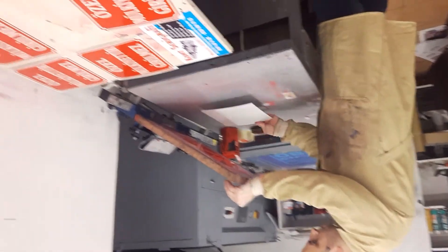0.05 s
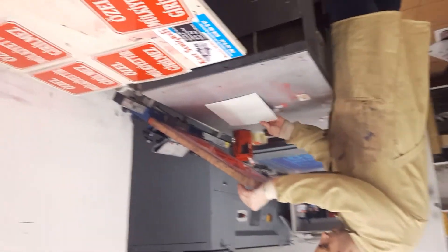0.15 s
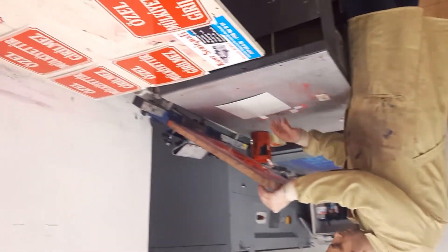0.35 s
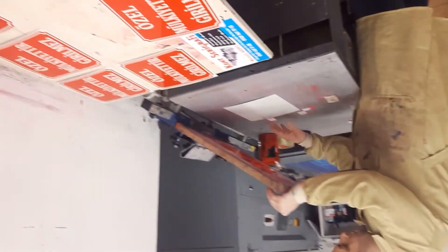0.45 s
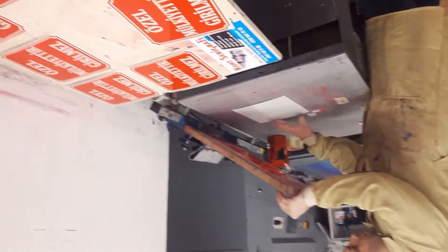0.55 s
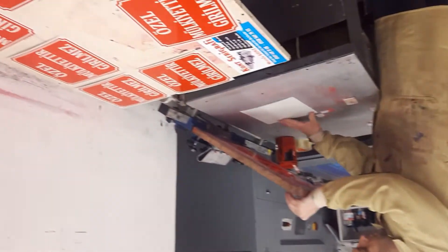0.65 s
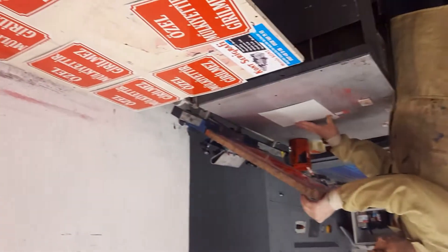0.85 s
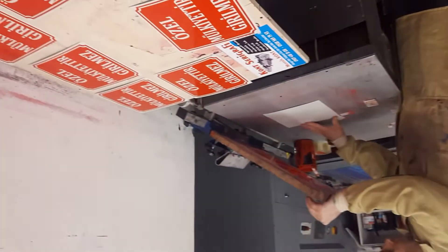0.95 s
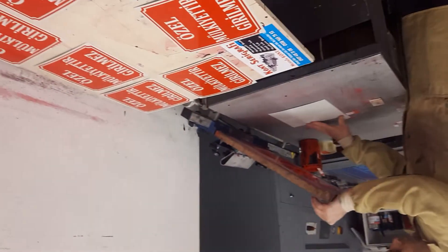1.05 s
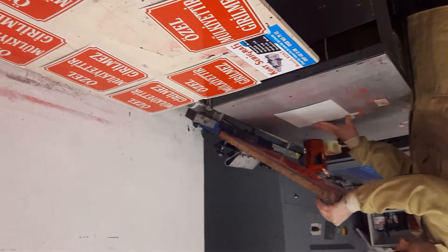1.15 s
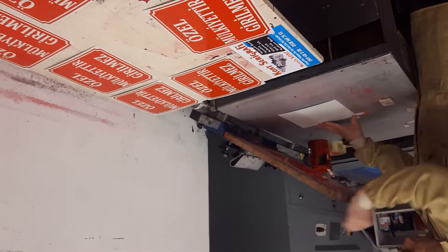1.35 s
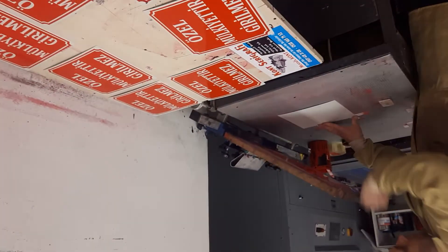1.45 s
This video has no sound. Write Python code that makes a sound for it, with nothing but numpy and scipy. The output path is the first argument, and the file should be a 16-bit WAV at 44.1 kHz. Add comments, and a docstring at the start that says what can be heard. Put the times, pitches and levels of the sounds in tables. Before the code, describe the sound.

Close by in a small workshop, a frame's rough edge catches and drags over a printing table with a ringing rasp, then shifts again. Afterwards a sheet slides gently into place among light knocks, over faint room noise.

```python
"""Small workshop: a screen-printing frame and a sheet are shifted on a printing table.
After a faint brush of the sheet, a rough edge catches, scrapes hard and is pushed once more;
its stick-slip sets the frame and table top ringing. The sheet then slides softly into place
among light knocks and a dull thump. Room air and faint mains hum lie underneath."""
import sys
import numpy as np
from scipy import signal
from scipy.fft import rfft, irfft
from scipy.io import wavfile
from scipy.ndimage import uniform_filter1d, minimum_filter1d

SR = 44100
rng = np.random.default_rng(int(sys.argv[2]) if len(sys.argv) > 2 else 0)


def log_audio(samples):
    """Write samples as a 16-bit WAV file to the path given in sys.argv[1]."""
    # one column per channel
    frames = np.atleast_2d(samples).T
    # limit to full scale, then quantise
    limited = np.clip(frames, -1, 1)
    pcm = np.round(limited * 32767).astype(np.int16)
    wavfile.write(sys.argv[1], SR, pcm)


N = 66150
TIME_S = np.arange(N) / SR
FFT_SIZE = 2 ** 17
FREQS_HZ = np.maximum(np.arange(FFT_SIZE // 2 + 1) * SR / FFT_SIZE, 1)


def from_db(db):
    """Decibels to gain."""
    return 10 ** (np.asarray(db) / 20)


def unit_rms(x):
    """Scale to rms 1."""
    return x / np.sqrt(np.mean(x ** 2) + 1e-20)


def envelope(rows):
    """Gain over time from rows of time_s, level_db."""
    return from_db(np.interp(TIME_S, *np.transpose(rows)))


def pulse(start_s, decay_s):
    """Instant onset, exponential decay."""
    return (TIME_S >= start_s) * np.exp(-np.abs(TIME_S - start_s) / decay_s)


def per_bin(rows):
    """Interpolate rows of freq_hz, value on a log-frequency axis."""
    freq_hz, value = np.transpose(rows)
    return np.interp(np.log(FREQS_HZ), np.log(freq_hz), value)


def colour(x, gain):
    """Minimum-phase filter with the given gain per bin."""
    cepstrum = irfft(np.log(gain + 1e-9))
    cepstrum[1:FFT_SIZE // 2] *= 2
    cepstrum[FFT_SIZE // 2 + 1:] = 0
    return irfft(rfft(x, FFT_SIZE) * np.exp(rfft(cepstrum)))[..., :N]


def shaped(x, spectrum):
    """Apply a spectrum, normalised so white noise keeps its power."""
    return colour(x, unit_rms(from_db(per_bin(spectrum))))


def drift(rate_hz):
    """Low-passed random wander, rms 1."""
    pole = np.exp(-2 * np.pi * rate_hz / SR)
    wander = signal.lfilter([1], [1, -2 * pole, pole * pole], rng.standard_normal(2 * N))
    return unit_rms(wander[N:])


def ring(force, modes):
    """Driven decaying modes, summed with alternating sign."""
    out = 0
    for k, (pitch_hz, gain_db, t60_s) in enumerate(modes):
        radius, angle = from_db(-60 / (t60_s * SR)), 2 * np.pi * pitch_hz / SR
        feedback = [1, -2 * radius * np.cos(angle), radius * radius]
        mode = signal.lfilter([0, np.sin(angle)], feedback, force + 1e-18)
        out = out + (-1) ** k * from_db(gain_db) * mode
    return out


def friction(snaps_per_s=2500, spread_db=2, hiss_share=0.49):
    """Two independent streams of tiny stick-slip snaps over hiss, rms 1."""
    size_db = spread_db * np.minimum(rng.exponential(1, (2, N)), 2.5)
    sizes = from_db(size_db) * rng.choice([-1, 1], (2, N))
    snaps = unit_rms(sizes * (rng.random((2, N)) < snaps_per_s / SR))
    return np.sqrt(1 - hiss_share) * snaps + np.sqrt(hiss_share) * rng.standard_normal((2, N))


# room air: freq_hz, gain_db
AIR_SPECTRUM = [(20, -4), (50, 4), (80, 1), (170, 2), (300, 0), (600, -12), (1200, -12.5), (2500, -16),
                (6000, -33), (9000, -39.5), (16000, -32)]


def room_air(level_db=-55):
    """Still air: steady, bass-heavy noise."""
    return from_db(level_db) * shaped(rng.standard_normal((2, N)), AIR_SPECTRUM)


def mains_hum(pitch_hz=50, level_db=-67):
    """Faint sine at mains frequency."""
    return from_db(level_db) * np.sqrt(2) * np.sin(2 * np.pi * pitch_hz * TIME_S)


# sliding sheet: time_s, level_db
SWISH_LEVEL = [(0, -53), (.15, -61.5), (.9, -72), (1.13, -55), (1.205, -57), (1.216, -45), (1.243, -48),
               (1.255, -40), (1.27, -40.5), (1.31, -44), (1.37, -51), (1.45, -54.5), (1.5, -54.5)]
# sliding sheet: freq_hz, gain_db
SWISH_SPECTRUM = [(300, -27), (1200, -5), (2000, -10.5), (2800, -10), (3370, 4.5), (3580, 7.5), (3760, 11),
                  (4100, -16.5), (4650, -20), (5300, -11), (7000, -19), (9000, -47), (16000, -46)]
# higher rub: time_s, level_db
RUB_ENVELOPE = [(0, -55), (.15, -86), (1.165, -74), (1.178, -46.5), (1.26, -47), (1.34, -58.5), (1.5, -64)]
# higher rub: freq_hz, gain_db
RUB_SPECTRUM = [(2500, -62), (4100, -5), (4480, 5.5), (4680, -1), (4850, 7), (5100, -16), (9000, -43)]


def sheet(flutter_db=1.2):
    """The sheet brushes faintly at first; later a high rub leads into a thin, fluttering swish."""
    flutter = from_db(flutter_db * drift(rate_hz=70))
    swish = shaped(friction() * envelope(SWISH_LEVEL) * flutter, SWISH_SPECTRUM)
    rub = shaped(friction() * envelope(RUB_ENVELOPE) * flutter, RUB_SPECTRUM)
    return swish + rub


# grip of the edge: time_s, level_db
RASP_LEVEL = [(.159, -92), (.162, -39.5), (.177, -39), (.186, -31), (.205, -34), (.245, -41), (.28, -36),
              (.305, -35), (.307, -22.5), (.345, -16.5), (.388, -20.5), (.425, -16.5), (.47, -21),
              (.53, -20.5), (.57, -25.5), (.62, -31.5), (.655, -29), (.695, -31.5), (.77, -25),
              (.838, -24.5), (.852, -28.5), (.92, -38.5), (1.02, -51), (1.12, -44), (1.18, -52), (1.5, -65)]
# friction rasp: freq_hz, gain_db
RASP_SPECTRUM = [(60, -70), (140, -38), (400, -8.5), (1000, -14.5), (1500, -11.5), (2000, -11),
                 (2800, -6.5), (3400, -4.5), (3850, -0.5), (4020, -4), (5000, -5.5), (6100, -9.5),
                 (7200, -11.5), (7900, -22.5), (9500, -39), (16000, -54)]
# treble sizzle: time_s, level_db
SIZZLE_ENVELOPE = [(.159, -98), (.163, -59), (.195, -58.5), (.245, -62), (.275, -54.5), (.305, -56),
                   (.308, -40.5), (.345, -38), (.435, -36.5), (.53, -43), (.6, -55), (.66, -58), (.69, -63),
                   (.77, -48), (.835, -46.5), (.87, -57), (.98, -82), (1.12, -68), (1.2, -97), (1.255, -73),
                   (1.32, -88)]
# treble sizzle: freq_hz, gain_db
SIZZLE_SPECTRUM = [(4000, -37), (8000, -1.5), (9500, -11), (11300, 3), (13000, 2), (16000, 0)]


def scrape(judder_db=0.94):
    """The edge judders over the surface in a spray of snaps: a rasp with fine sizzle on top."""
    snaps = friction() * from_db(judder_db * drift(rate_hz=48))
    rasp = shaped(snaps * envelope(RASP_LEVEL), RASP_SPECTRUM)
    sizzle = shaped(snaps * envelope(SIZZLE_ENVELOPE), SIZZLE_SPECTRUM)
    return rasp + sizzle


# drag on the frame: time_s, level_db
DRAG_LEVEL = [(0, -92), (.16, -68), (.175, -38.5), (.21, -35), (.26, -36.5), (.30, -38), (.335, -24.5),
              (.41, -29), (.46, -31), (.53, -37), (.6, -38), (.69, -36.5), (.8, -51), (.86, -40),
              (.94, -46.5), (1.03, -56), (1.2, -48), (1.27, -47), (1.33, -54), (1.5, -59)]
# frame resonances: pitch_hz, gain_db, t60_s
FRAME_MODES = [(635, -4.5, 0.18), (671, -1, 0.15), (722, -2.5, 0.33), (774, -6.5, 0.24), (805, -2.5, .2),
               (882.8, 0, 0.15), (949, 4, 0.11), (1005, 1, .09), (1077, -0.5, 0.081)]


def frame():
    """Drag keeps the frame's modes ringing."""
    return unit_rms(ring(friction(), FRAME_MODES)) * envelope(DRAG_LEVEL)


# frame groan: time_s, level_db
GROAN_ENVELOPE = [(.16, -91), (.185, -40), (.27, -44), (.3, -34.5), (.33, -40.5), (.37, -32.5), (.42, -30),
                  (.46, -58), (.59, -41.5), (.71, -45), (.78, -73)]


def groan(pitch_hz=633, waver_hz=3.1, roughness_db=2.9):
    """Stick-slip in step with the frame's lowest mode: a rough, wavering tone."""
    freq_hz = pitch_hz + waver_hz * drift(rate_hz=17)
    tone = np.sqrt(2) * np.sin(2 * np.pi * np.cumsum(freq_hz) / SR)
    roughness = from_db(roughness_db * drift(rate_hz=45))
    return envelope(GROAN_ENVELOPE) * roughness * tone


# table-top vibration: time_s, level_db
TABLE_LEVEL = [(.16, -74), (.2, -38), (.3, -38), (.38, -40), (.44, -34), (.53, -33.5), (.62, -42),
               (.73, -39), (.81, -49.5), (.86, -36.5), (.93, -42), (.99, -43.5), (1.06, -49.5),
               (1.2, -47.5), (1.28, -42), (1.36, -47.5), (1.5, -55)]
# table-top rumble: freq_hz, gain_db
RUMBLE_SPECTRUM = [(40, -32), (95, -31), (125, -3), (155, -17.5), (190, -5), (250, -11), (350, -3.5),
                   (450, -3.5), (560, -9.5), (900, -17.5), (3000, -50.5)]
# table-top resonances: pitch_hz, gain_db, t60_s
TABLE_MODES = [(131.2, -5.5, .34), (155.1, -4.5, 0.53), (194.6, -9, 0.42), (291, -1, 0.19), (348, -2, 0.66),
               (380, -1, 0.13), (427, -0.5, 0.08), (500, -5, 0.19), (525.4, -7, 0.25)]


def table_top(rumble_db=-3, ring_db=-4):
    """The table top rumbles and rings under the moving frame."""
    rumble = from_db(rumble_db) * shaped(friction(), RUMBLE_SPECTRUM)
    ringing = from_db(ring_db) * unit_rms(ring(friction(), TABLE_MODES))
    return envelope(TABLE_LEVEL) * (rumble + ringing)


# knocks on the frame: start_s, level_db
KNOCK_HITS = [(0.3, -26), (0.836, -34), (0.852, -35.5), (1.130, -33.5), (1.139, -35), (1.240, -40),
              (1.270, -41.5)]
# contact noise: freq_hz, gain_db
KNOCK_SPECTRUM = [(100, -27), (350, 4), (620, -8.5), (780, 12), (870, -2), (1020, 2.5), (1500, -20),
                  (4000, -23), (8000, -44), (16000, -69)]


def knocks(decay_s=0.0082, ring_db=-11):
    """Short clatters of contact that also ring the frame."""
    force = sum(from_db(level_db) * pulse(start_s, decay_s) for start_s, level_db in KNOCK_HITS)
    contact = shaped(force * rng.standard_normal((2, N)), KNOCK_SPECTRUM)
    ringing = contact.std() * unit_rms(ring(contact, FRAME_MODES))
    return contact + from_db(ring_db) * ringing


# edge catches: start_s, level_db, centre_hz, width_hz
EDGE_CATCHES = [(0.309, -19.5, 3000, 854), (1.25, -34.5, 3700, 500)]


def catches(decay_s=0.017):
    """The edge catches and lets go: a burst of snaps into one broad resonance, a bright chirr."""
    out = 0
    for start_s, level_db, centre_hz, width_hz in EDGE_CATCHES:
        burst = friction() * pulse(start_s, decay_s)
        band_hz = [centre_hz - width_hz / 2, centre_hz + width_hz / 2]
        band = signal.butter(2, band_hz, "band", fs=SR, output="sos")
        makeup_gain = np.sqrt(SR / 2 / width_hz)
        out = out + from_db(level_db) * makeup_gain * signal.sosfilt(band, burst)
    return out


def thump(start_s=1.472, push_s=0.0054, force_db=-54.5):
    """A soft push and rebound excites the table top's deep modes."""
    age = np.maximum(TIME_S - start_s, 0) / push_s
    force = from_db(force_db) * age * (2 - age) * np.exp(-age)
    return ring(force, TABLE_MODES)


def workshop(x, wet_db, gap_s=0.0029, t60_s=0.69, treble_t60_s=0.12, crossover_hz=6530):
    """Direct sound plus a short diffuse tail whose treble dies sooner."""
    noise = rng.standard_normal((2, N)) * (TIME_S > gap_s)
    low = signal.sosfilt(signal.butter(3, crossover_hz, "low", fs=SR, output="sos"), noise)
    high = signal.sosfilt(signal.butter(3, crossover_hz, "high", fs=SR, output="sos"), noise)
    slow, fast = from_db(-60 * TIME_S / t60_s), from_db(-60 * TIME_S / treble_t60_s)
    tail = (low * slow + high * fast) / np.sqrt(np.sum(slow ** 2))
    reverb = irfft(rfft(x, FFT_SIZE) * rfft(tail, FFT_SIZE))[:, :N]
    return x + from_db(wet_db) * reverb


# left-right likeness: freq_hz, correlation
STEREO_CORRELATION = [(100, 0.98), (300, 0.93), (650, 0.78), (1100, 0.35), (2000, 0), (4000, 0.32),
                      (16000, 0)]
# left minus right: freq_hz, lead_db
STEREO_BALANCE = [(100, 1.5), (450, 1.5), (740, 2), (1220, 5.5), (2000, 5.5), (2800, 10), (3700, 17),
                  (4600, 15), (5500, 9), (6800, -4.5), (9000, 0.5), (11000, 8), (15000, -2)]


def microphones(pair):
    """Two ports hear the bass alike and the treble apart; the left is brighter."""
    correlation = np.clip(per_bin(STEREO_CORRELATION), -.99, .99)
    mid = colour(pair[0], np.sqrt(1 + correlation))
    side = colour(pair[1], np.sqrt(1 - correlation))
    lead_db = per_bin(STEREO_BALANCE)
    left, right = from_db(lead_db / 2), from_db(-lead_db / 2)
    norm = np.sqrt((left ** 2 + right ** 2 + 2 * correlation) / 2)
    return np.array([colour(mid + side, left / norm), colour(mid - side, right / norm)])


def scene():
    """Handling noise in the room over air; groan, thump and hum dry and centred."""
    air = room_air()
    surfaces = workshop(scrape() + sheet() + catches(), wet_db=-5)
    bodies = workshop(frame() + table_top() + knocks(), wet_db=-11)
    return microphones(surfaces + bodies + air) + groan() + thump() + mains_hum()


def record(dry):
    """Steep low-pass, then a fast limiter at full scale."""
    cutoff_hz, window_samples = 15800, 65
    x = signal.sosfilt(signal.ellip(12, .1, 80, cutoff_hz, fs=SR, output="sos"), dry)
    gain = 1 / np.maximum(np.abs(x), 1)
    held_gain = minimum_filter1d(gain, size=window_samples)
    return x * uniform_filter1d(held_gain, size=window_samples)


dry = scene()
out = record(dry)
log_audio(out)
```